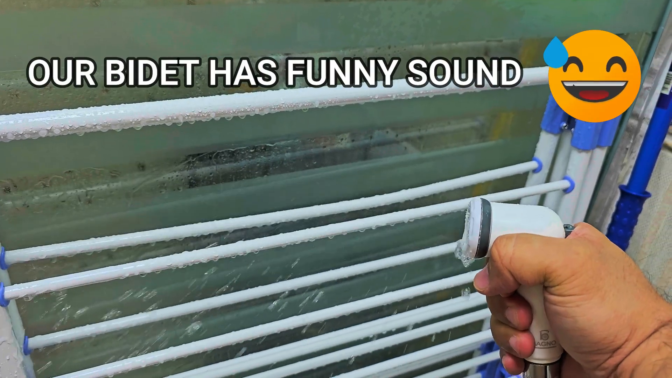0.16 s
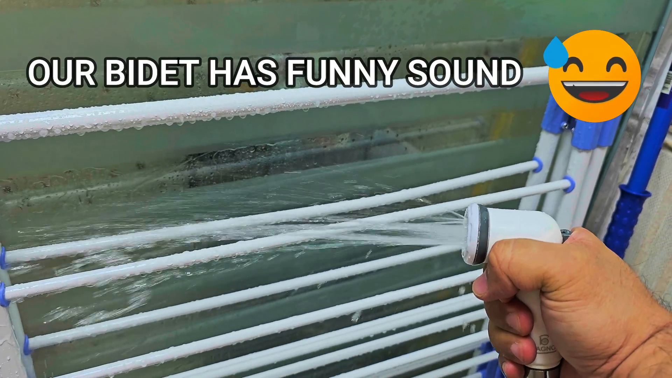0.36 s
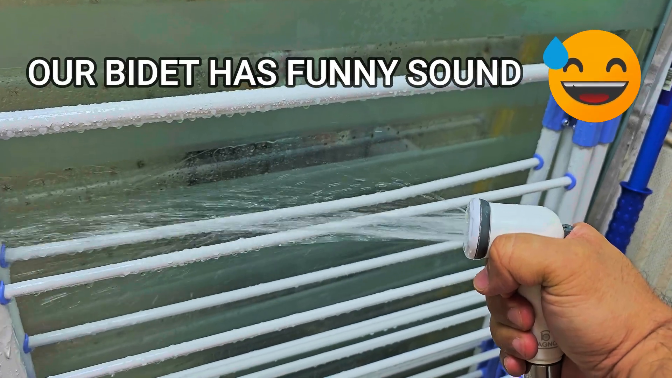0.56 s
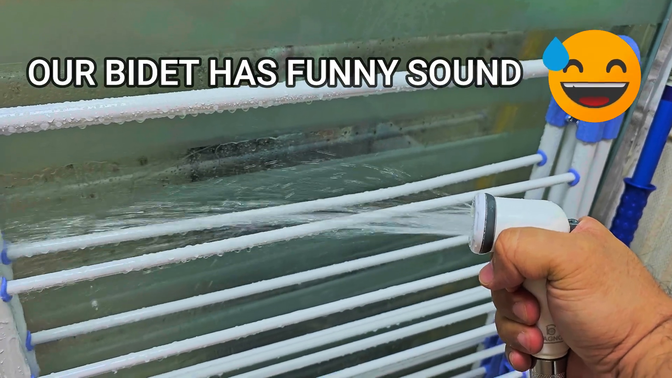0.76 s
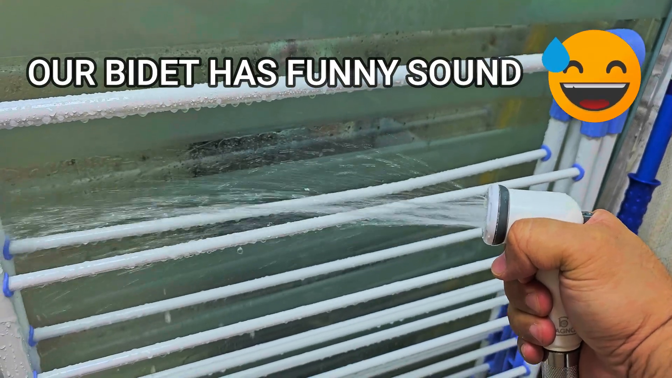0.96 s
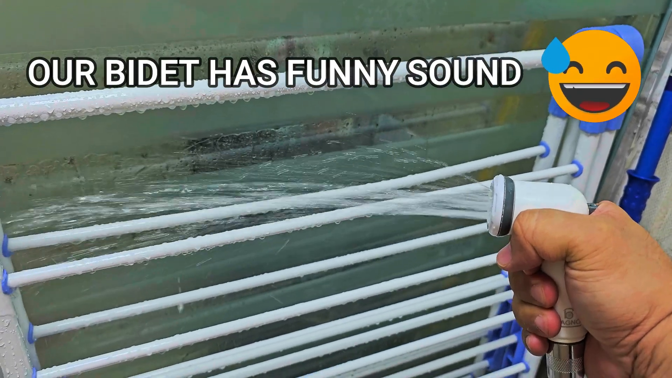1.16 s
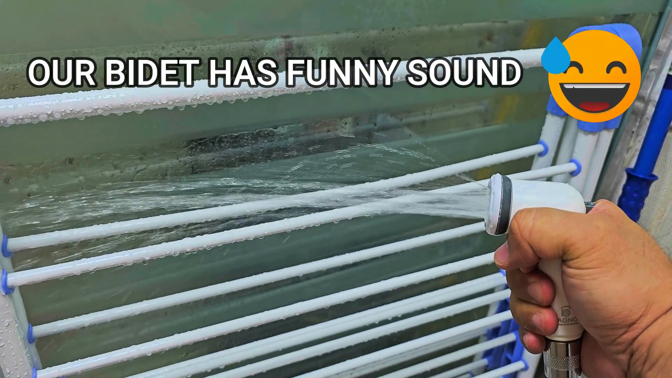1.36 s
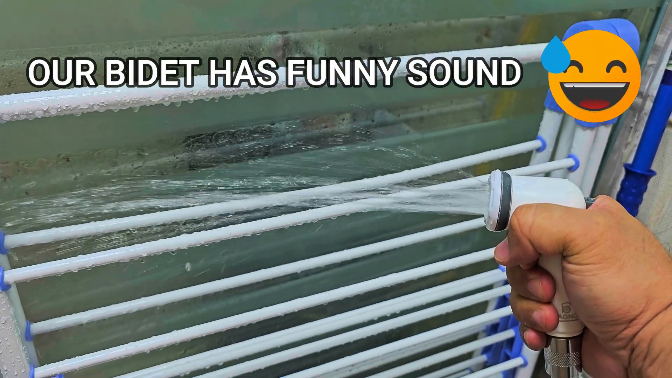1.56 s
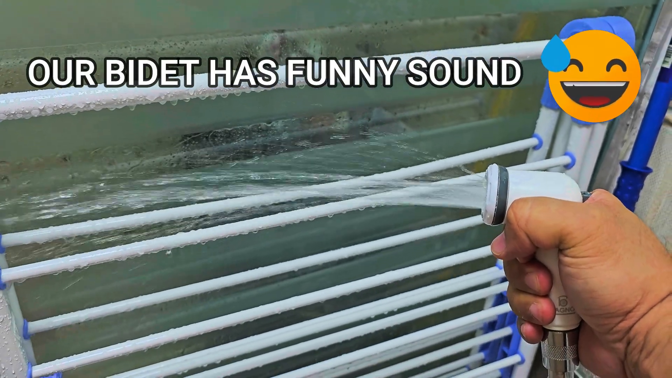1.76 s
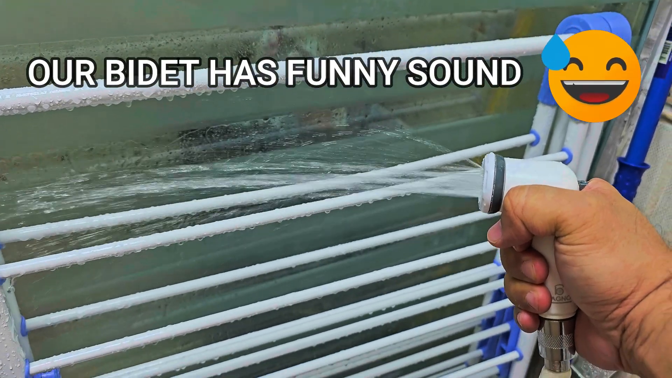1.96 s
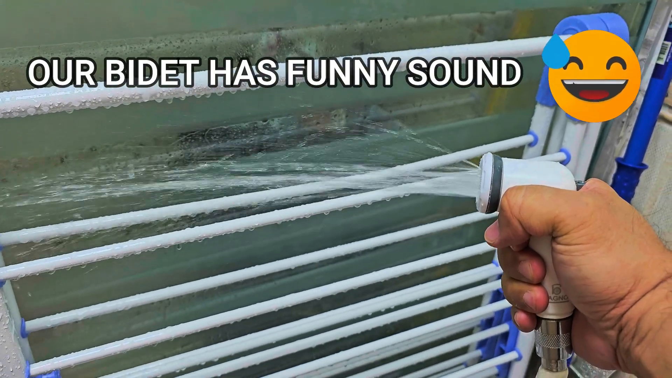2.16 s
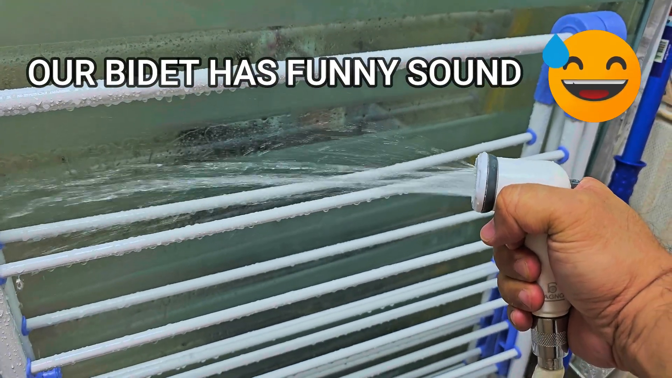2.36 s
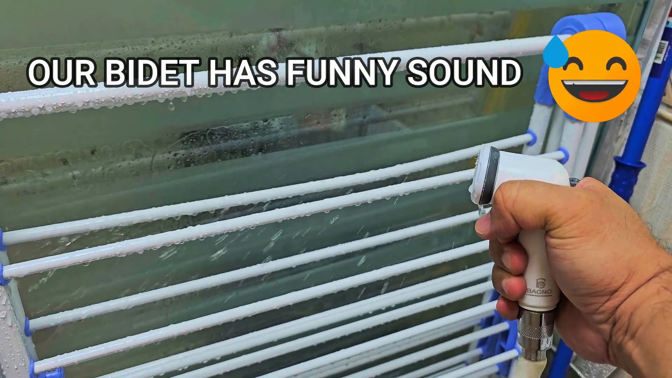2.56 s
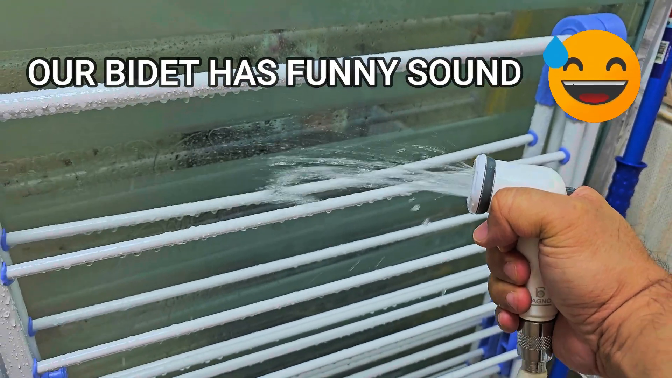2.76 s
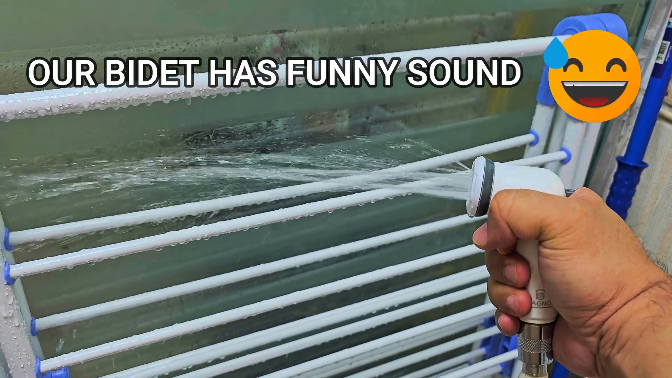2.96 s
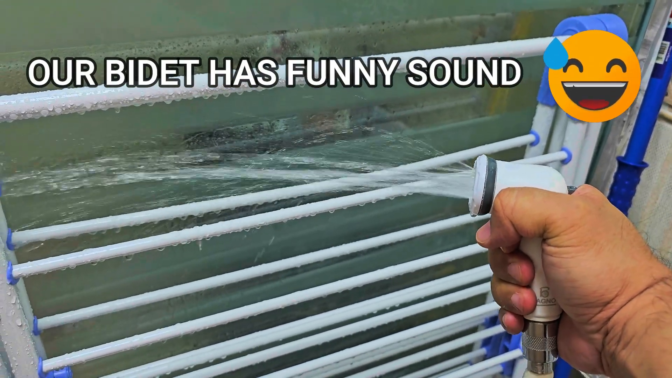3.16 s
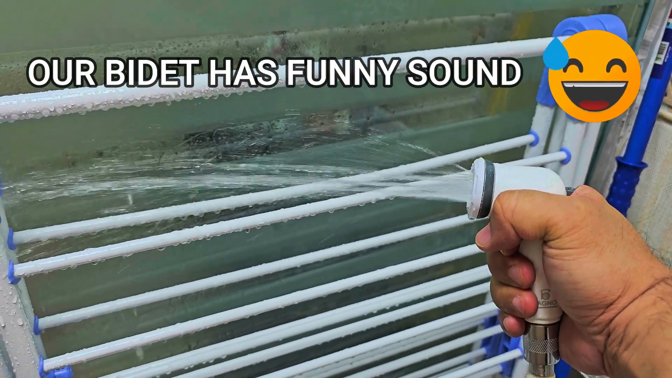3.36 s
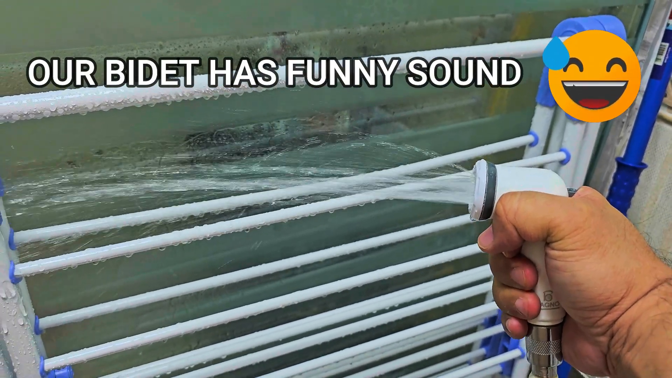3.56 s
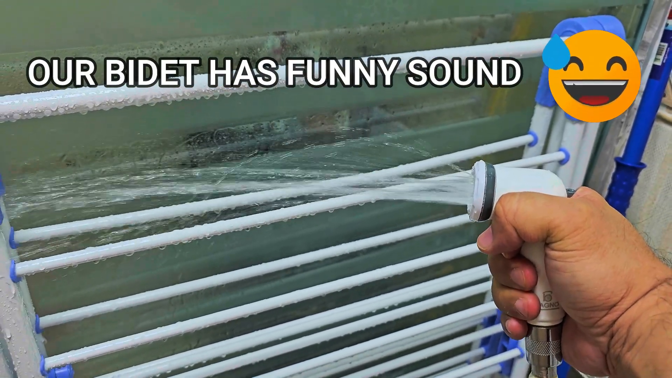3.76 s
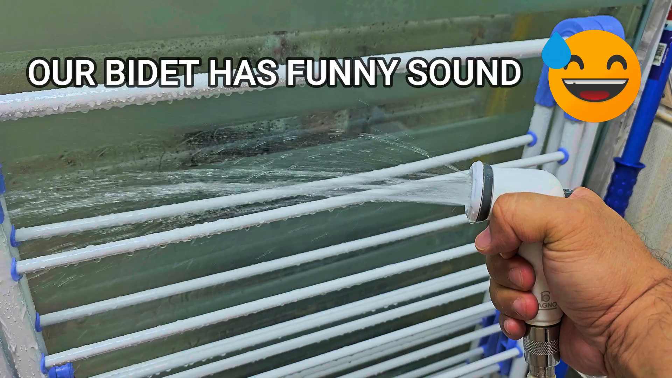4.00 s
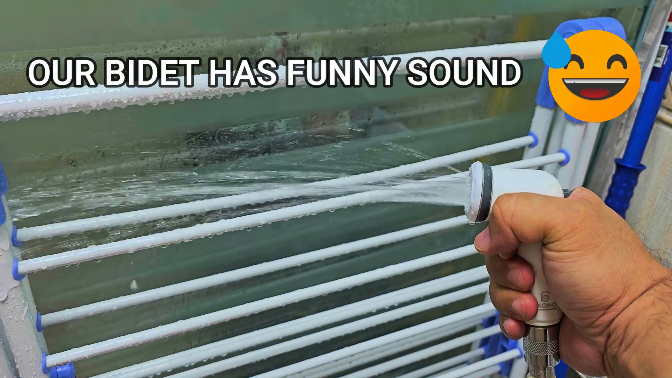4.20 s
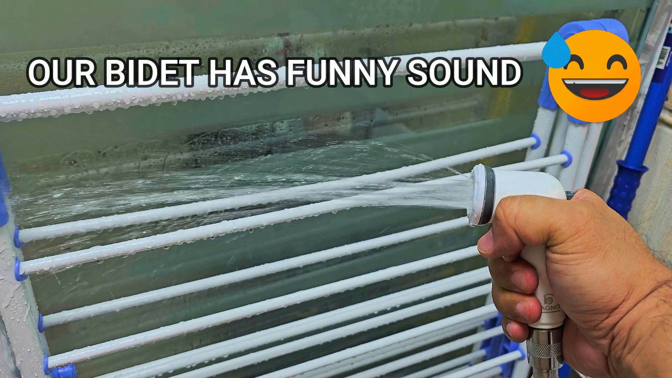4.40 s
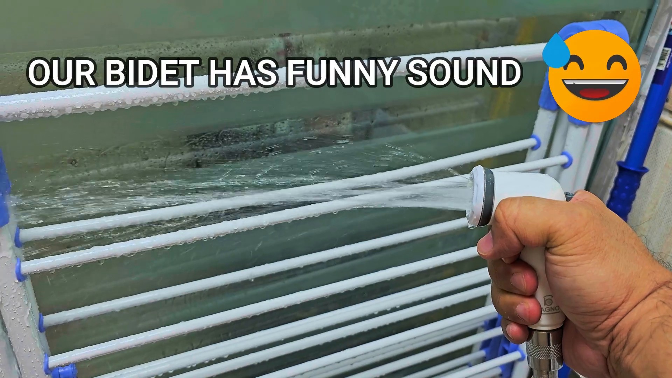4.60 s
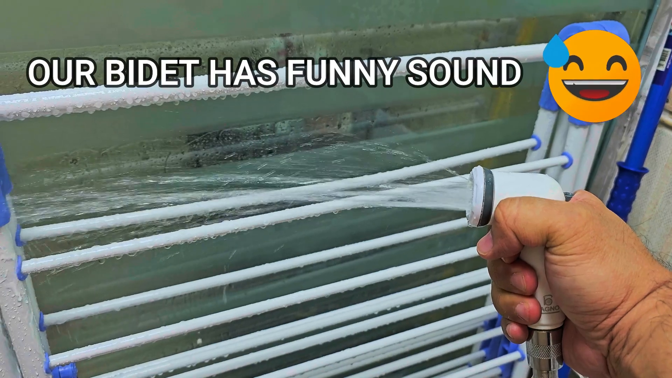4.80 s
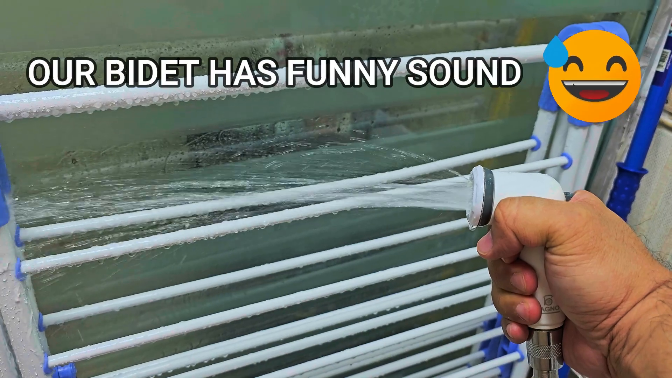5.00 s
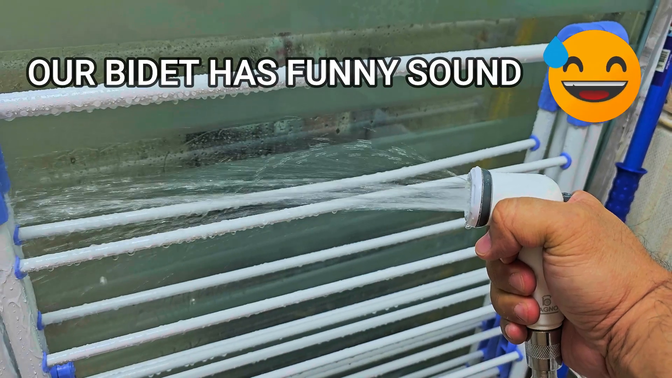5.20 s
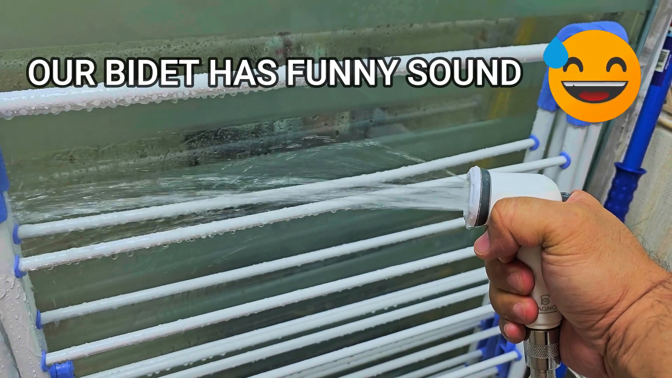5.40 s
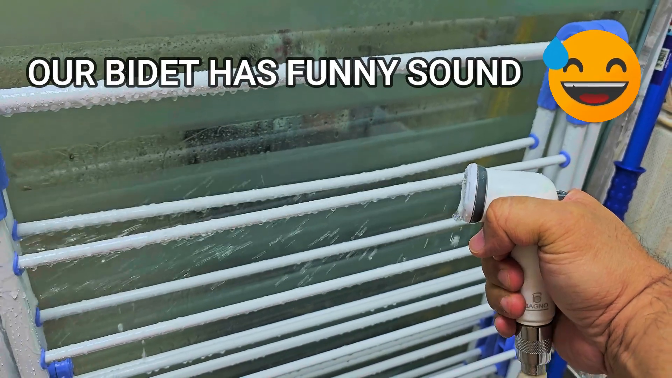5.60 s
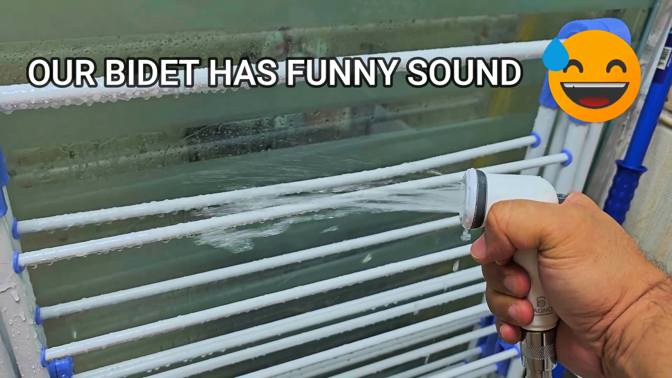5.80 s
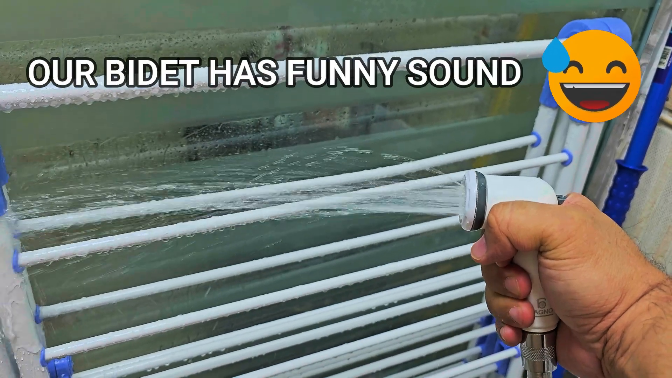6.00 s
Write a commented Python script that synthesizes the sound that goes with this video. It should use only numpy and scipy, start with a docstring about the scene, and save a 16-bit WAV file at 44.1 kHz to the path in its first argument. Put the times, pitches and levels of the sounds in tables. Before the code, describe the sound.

A handheld water sprayer squeals with a loud, buzzy, wavering whistle over hissing spray on glass, stopping and restarting three times above a fan hum.

```python
"""A water sprayer in a tiled bathroom starts in mid-squeeze, is let go almost at once, and is pressed again three times.
An extractor fan hums throughout: a blade tone, noise-driven duct resonances and a draught of filtered noise.
At each press a hiss of shaped noise, the jet on glass, and a wavering buzz, harmonics of the valve, start together.
Rate and level sag soon after each later press; at a release the rate climbs, the sound stops and run-off hiss decays.
The last squeeze lasts to the end; sparse, decaying tile echoes surround the valve's tones."""
import sys
import numpy as np
from scipy import signal
from scipy.fft import rfft, irfft, next_fast_len
from scipy.io import wavfile
from scipy.ndimage import uniform_filter1d

SR = 44100
rng = np.random.default_rng(int(sys.argv[2]) if len(sys.argv) > 2 else 0)


def digitize_waveform(pressure):
    """Quantize a signal to 16-bit integers and store it at the path in sys.argv[1].

    Rows of a 2-D input are taken as channels; values are limited to [-1, 1].
    """
    field = np.atleast_2d(pressure).T
    bounded = np.clip(field, -1, 1)
    quanta = np.round(bounded * 32767).astype(np.int16)
    wavfile.write(sys.argv[1], SR, quanta)


N = 266716

# Squeezes of the trigger: (press [s], release [s], depth of the pressure surge [Hz], sag of the rate [Hz],
# closing time [s], level lost in the sag [dB], opening time [s])
SQUEEZES = [(-2, .065, 0, 0, .053, 0, .01), (.251, 2.47, 55.4, 4.8, .052, 5, .014),
            (2.687, 5.525, 33.7, 20.2, .032, 8, .028), (5.732, 6.5, 21.6, 31.6, .032, 6, .01)]
SAG_LEVEL_S = 0.07  # width of the dip in level, valve and jet alike


def gain_of(db):
    """Decibels are twenty times the logarithm of an amplitude ratio."""
    return 10 ** (np.asarray(db) / 20)


def evened(x):
    """Division by the root mean square leaves a signal of unit power."""
    return x / np.sqrt(np.mean(x ** 2) + 1e-20)


def read(points, hz):
    """A response is interpolated along logarithmic frequency."""
    f, value = np.transpose(points)
    return np.interp(np.log(hz + 1), np.log(f + 1), value)


def wander(count, per_s):
    """White noise averaged twice becomes a slow random drift of rms 1."""
    size = max(round(SR / per_s), 1)
    smooth = uniform_filter1d(rng.standard_normal(count), size)
    return evened(uniform_filter1d(smooth, size))


def noise(spectrum, patchy_db):
    """Diffuse noise: random short-time spectra whose left-right coherence falls with frequency."""
    # Coherence of the two sides: (frequency [Hz], left-right likeness [0 to 1])
    likeness = [(30, .93), (60, .97), (250, .97), (640, .5), (1400, .05), (15000, .05)]
    hz = np.fft.rfftfreq(1024, 1 / SR)
    a, b, c, d, patches = rng.standard_normal((N // 256 + 5, 513, 5)).T
    # smoothing over frequency and time makes drifting patches of level
    patches = uniform_filter1d(patches, size=12, axis=0)
    patches = evened(uniform_filter1d(patches, size=10, axis=1))
    same = np.clip(read(likeness, hz), -1, 1)[:, None]
    left = a + 1j * b
    right = same * left + np.sqrt(1 - same ** 2) * (c + 1j * d)
    level_db = read(spectrum, hz)[:, None] + patchy_db * patches
    z = np.array([left, right]) * gain_of(level_db)
    return signal.istft(z, nperseg=1024, noverlap=768)[1][:, :N]


def fan():
    """Periodic blade passage gives a tone; noise exciting damped duct modes gives moans, turbulence a draught."""
    # Duct modes moaning in the air flow: (frequency [Hz], bandwidth [Hz], rms level [dB])
    duct_modes = [(103.6, 7.7, -49.5), (113.7, 11, -44.5), (146, 6.5, -38), (259.6, 42, -44.5)]
    # Spectrum shape of the draught: (frequency [Hz], relative density [dB per Hz])
    draught = [(20, -17), (60, -9.5), (150, -1), (330, -2.5), (550, -10), (800, -10), (1300, -6.5),
               (1800, -18), (2200, -19), (3000, -8.5), (6000, -16), (11000, -13), (15600, -32)]
    hum_hz, hum_db, draught_db = 203.7, -28, -33.5
    t = np.arange(N) / SR
    turns = np.cumsum(hum_hz + 0.48 * wander(N, 2.14)) / SR
    hum_gain = gain_of(hum_db + 0.96 * wander(N, 10.5))
    out = hum_gain * np.sqrt(2) * np.cos(2 * np.pi * turns)
    for hz, width, db in duct_modes:
        r = np.exp(-np.pi * width / SR)
        drive = rng.standard_normal(N) + 1j * rng.standard_normal(N)
        # low-passed complex noise, moved up to the mode's frequency
        slow = signal.lfilter([1], [1, -2 * r, r * r], drive)
        out += gain_of(db) * evened((slow * np.exp(2j * np.pi * hz * t)).real)
    return out + gain_of(draught_db) * evened(noise(draught, patchy_db=4.0))


def bathroom(x):
    """Reverberation: sparse random-sign echoes, independent left and right, decay exponentially in each band."""
    # Decay of the tiled room: (frequency [Hz], time to fall 60 dB [s])
    tiles = [(300, 0.63), (1000, 0.5), (2100, 0.22), (3500, 0.38), (8000, 0.21), (15000, 0.049)]
    # Echo energy, 0 dB being that of the direct sound: (frequency [Hz], level [dB])
    wet = [(450, -3.5), (1000, -2), (2200, 0.5), (4000, -0.5), (9000, 7), (15000, 7.5)]
    taps = np.zeros((2, SR // 2))
    start = np.arange(60, SR // 2 - 20, 20)
    at = start + rng.integers(0, 20, (2, len(start)))
    np.put_along_axis(taps, at, rng.choice([-1., 1.], at.shape), 1)
    hz, t, z = signal.stft(taps, SR, nperseg=256)
    z *= gain_of(-60 * t / np.maximum(read(tiles, hz), .03)[:, None])
    # each band is brought to energy 1 at 0 dB; the last factor belongs to the window
    band_gain = gain_of(read(wet, hz)) / np.linalg.norm(z, axis=2).mean(0)
    z *= band_gain[:, None] * np.sqrt(3 / 4) / 128
    echoes = signal.istft(z, SR, nperseg=256)[1]
    return signal.fftconvolve(x[None], echoes, axes=1)[:, :N]


def sag(t, press, width):
    """A Gaussian bell of height 1 marks the first pressure trough after a press."""
    return np.exp(-((t - press - .267) / width) ** 2)


def jet():
    """Turbulence makes broadband noise: the jet on glass swells at a press, sags, and decays around the release."""
    # Spectrum shape of the jet: (frequency [Hz], relative density [dB per Hz])
    hiss_colour = [(300, -11.5), (700, -26), (1700, -21), (2100, -4.5), (2400, -9), (2700, -15),
                   (3100, -1.5), (4500, -4), (5500, -3.5), (8000, 7), (10000, 10.5), (12000, 4.5),
                   (14000, -16), (15800, -15)]
    # Water running off after each release: (time [s], starting level [dB])
    run_off = [(.065, -48), (2.47, -27.5), (5.525, -39)]
    held_db, start_db, gust_db = -11.5, -11, 0.74  # start_db is relative to held_db
    rise, sag_share = 0.51, 1.1  # in opening times; share of the buzz's sag
    lead_s, fall_db_per_s = 0.034, 248  # the fall starts a little before the release
    run_off_fall_db_per_s = 26
    t, level = np.arange(N) / SR, np.zeros(N)
    for press, release, _, _, _, sag_db, opening_s in SQUEEZES:
        since = np.maximum(t - press, 0)
        db = held_db + start_db * np.exp(-since / (rise * opening_s))
        db -= sag_share * sag_db * sag(t, press, SAG_LEVEL_S)
        db -= fall_db_per_s * np.maximum(t - release + lead_s, 0)
        level += (t >= press) * gain_of(db)
    for s, db in run_off:
        level += (t >= s) * gain_of(db - run_off_fall_db_per_s * np.maximum(t - s, 0))
    hiss = evened(noise(hiss_colour, patchy_db=-0.5))
    return level * gain_of(gust_db * wander(N, 29.0)) * hiss


def flutter(press, release, surge_hz, sag_hz, closing_s, sag_db, opening_s):
    """Flow-driven valve oscillation: a periodic beat has harmonics, which the head's resonances colour."""
    # Base rate of the buzz, wavering through the squeezes: (time [s], rate [Hz])
    base_rate = [(0, 474.7), (.25, 455.9), (.34, 470.3), (1.18, 463.7), (2.38, 466.8), (2.44, 453.3),
                 (2.47, 462), (2.69, 469.8), (2.72, 492.4), (2.78, 480.1), (2.82, 482.9), (2.86, 488.5),
                 (2.96, 471.2), (3.76, 464.2), (3.9, 471.9), (4.14, 468.7), (4.26, 476.2), (4.38, 468.6),
                 (4.76, 462.9), (5.46, 463.7), (5.5, 471.6), (5.73, 476.7), (6.05, 452.5)]
    # Strength of the strongest tones: (time [s], shriek level [dB], level of the lowest tone [dB])
    tone_levels = [(0, -19.5, -21), (.06, -31, -34.5), (.26, -23, -41), (.33, -24, -24), (.55, -28.5, -21),
                   (.72, -29, -21), (.89, -34.5, -52), (1.02, -26, -25), (1.22, -33.5, -17),
                   (1.37, -25.5, -25), (1.6, -26.5, -23), (2.05, -24.5, -26.5), (2.23, -29, -21),
                   (2.41, -21, -40), (2.47, -22.5, -18.5), (2.69, -37, -45), (2.72, -18.5, -32),
                   (2.9, -29.5, -26), (3.17, -27, -23.5), (3.25, -26.5, -35), (3.52, -28.5, -26.5),
                   (3.63, -36, -34.5), (3.88, -25, -25), (3.99, -30.5, -36), (4.22, -27, -25),
                   (5.1, -26, -29), (5.45, -26, -24.5), (5.5, -20.5, -37), (5.73, -21, -38),
                   (5.83, -26, -28.5), (5.96, -27, -21), (6.05, -25, -25.5)]
    # Colour of the buzz: (frequency [Hz], relative level [dB])
    head = [(800, -4.5), (1000, -5.5), (1400, -3.5), (1800, -10.5), (2350, -5), (2600, -10.5), (2900, 2),
            (3700, 0), (5500, -3.5), (8000, -2), (10000, 1.5), (12000, -11), (13000, -18), (15800, -32)]
    # Resonances of the plastic head: (frequency [Hz], width [Hz], boost [dB])
    rings = [(2060, 260, 7), (3250, 200, 2)]
    buzz_db, swing_db, closing_db, opening_db = -15, -0.22, -4.5, -6  # held level and its changes
    bounce_hz, bounce_per_s, bounce_s, bounce_rad = 35.3, 8.115, .085, .41  # quick dying bounce of the rate
    surge_per_s, surge_s, surge_low_s = 1.444, .76, .274  # slow dying swing of pressure in the hose
    sag_s, climb_hz = .046, 124  # width of the rate's sag; climb as the valve shuts
    ragged = .009  # share by which the rate jitters while the valve is opening or closing

    t = np.arange(max(press, 0), min(release, N / SR), 1 / SR)
    since = t - press
    closing, opening = np.exp((t - release) / closing_s), np.exp(-since / opening_s)
    s, shriek_db, low_db = np.transpose(tone_levels)
    shriek_db, low_db = np.interp(t, s, shriek_db), np.interp(t, s, low_db)
    level_db = buzz_db + swing_db * wander(len(t), 3.0) - sag_db * sag(t, press, SAG_LEVEL_S)
    # the buzz starts softer, swells quickly, and weakens towards the release
    level_db += closing_db * closing + opening_db * opening

    base_hz = np.interp(t, *np.transpose(base_rate))
    rate_hz = uniform_filter1d(base_hz, size=500, mode="nearest")
    bounce = np.cos(2 * np.pi * bounce_per_s * since + bounce_rad)
    rate_hz += bounce_hz * np.exp(-since / bounce_s) * bounce
    surge = np.cos(2 * np.pi * surge_per_s * (since - surge_low_s))
    rate_hz -= surge_hz * np.exp(-since / surge_s) * surge
    rate_hz += climb_hz * closing - sag_hz * sag(t, press, sag_s)
    jitter = .0012 * wander(len(t), 60) + ragged * (closing + opening) * wander(len(t), 300)
    turns = np.cumsum(rate_hz * (1 + jitter)) / SR

    # while the rate is changing fast the flow is unsettled and the tones sputter
    change_hz_per_s = abs(np.gradient(rate_hz)) * SR
    sputter_db = np.minimum(uniform_filter1d(change_hz_per_s, size=1500) / 90, 4.5)
    tones = []
    for k in range(2, 33):
        hz = k * rate_hz
        ring_db = sum(db / (1 + (2 * (hz - f) / width) ** 2) for f, width, db in rings)
        drift_db = 1.33 * wander(len(t), 10.6) + sputter_db * wander(len(t), 46)
        colour_db = read(head, hz) + ring_db + drift_db
        tones.append(gain_of(colour_db) * np.cos(2 * np.pi * (k * turns + rng.random())))
    # the fourth and fifth harmonics lie about the main ring of the head and carry the shriek
    shriek = tones.pop(2) + tones.pop(2)
    shriek /= np.sqrt(uniform_filter1d(shriek ** 2, size=2000) + 1e-12)
    low_gain = gain_of(1.1 * sputter_db * wander(len(t), 43))
    low = low_gain * np.sqrt(2) * np.cos(2 * np.pi * turns)
    fade = np.clip(np.minimum(since / 0.0013, (release - t) / 0.021), 0, 1)
    buzz = gain_of(level_db) * evened(sum(tones))
    sound = fade * (buzz + gain_of(shriek_db) * shriek + gain_of(low_db) * low)
    return round(t[0] * SR), sound


def scene():
    """Superposition: direct valve sound, its reverberation, jet and fan add linearly."""
    # Phase lead of the left side over the right: (frequency [Hz], phase [rad])
    left_lead = [(300, 0), (460, -.4), (930, 0), (1400, .6), (1870, 1.6), (2330, -.3), (2800, .6),
                 (3270, 3), (3730, -.7), (4200, -.8), (4660, 1.6), (5130, 1.2), (5600, -1.5), (9000, 2.5)]
    valve = np.zeros(N)
    for row in SQUEEZES:
        at, sound = flutter(*row)
        valve[at:at + len(sound)] = sound[:N - at]
    # each tone reaches left and right with its own phase difference, as in a reverberant room
    size = next_fast_len(N)
    lead = read(left_lead, np.fft.rfftfreq(size, 1 / SR)) / 2
    turned = rfft(valve, size) * np.exp(1j * np.array([lead, -lead]))
    near = irfft(turned, size)[:, :N]
    return near + bathroom(valve) + jet() + fan()


def record(dry):
    """Linear port filters, then level-dependent gain, a hard ceiling and a band limit."""
    # Each microphone sits behind its own port with its own colour: (frequency [Hz], gain [dB])
    left_port = [(100, 3.5), (450, 1.5), (1300, 0.5), (2000, 5.5), (3300, -3.5), (5500, 7.5), (7400, -1.5),
                 (8400, -9.5), (9700, -16), (11500, 2.5), (12300, 0), (14000, 8), (15300, 6)]
    right_port = [(100, 2), (450, 4.5), (1300, -2.5), (2000, 7), (3300, -3), (5500, -0.5), (7000, -2.5),
                  (7500, 0), (8800, -3), (9800, -10.5), (10300, -12), (12500, -2), (14000, 11.5),
                  (15600, 5.5)]
    size = next_fast_len(N)
    hz = np.fft.rfftfreq(size, 1 / SR)
    port_gain = gain_of([read(left_port, hz), read(right_port, hz)])
    heard = irfft(rfft(dry, size) * port_gain, size)[:, :N]
    power = uniform_filter1d((heard ** 2).mean(0), size=3000)
    power_db = 10 * np.log10(abs(power) + 1e-12)
    # above -21 dB the gain falls by 0.22 dB per dB
    held = heard * gain_of(0.5 - 0.22 * np.maximum(power_db + 21, 0))
    held = np.clip(held, -1, 1)
    low_pass = signal.firwin(511, 15805, window=("kaiser", 9), fs=SR)  # edge in Hz
    return signal.oaconvolve(held, low_pass[None], "same")


dry = scene()
out = record(dry)
digitize_waveform(out)
```